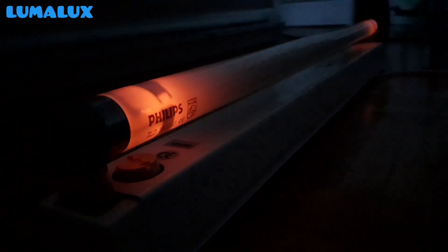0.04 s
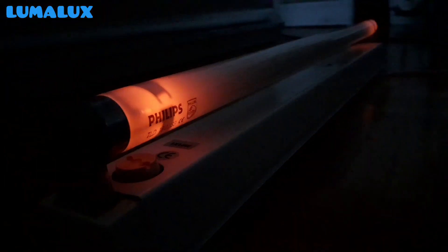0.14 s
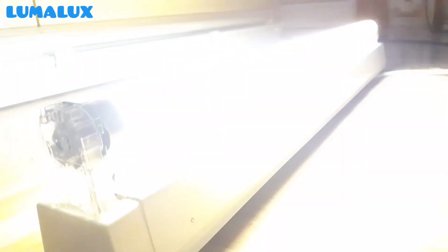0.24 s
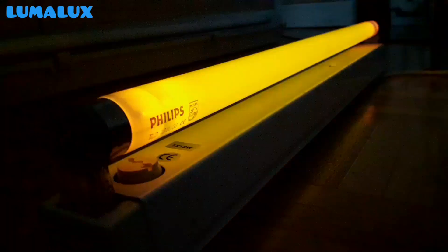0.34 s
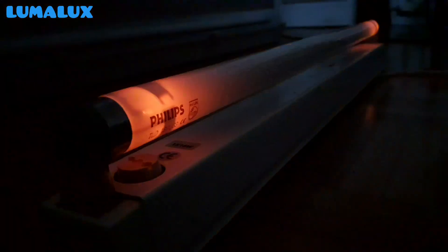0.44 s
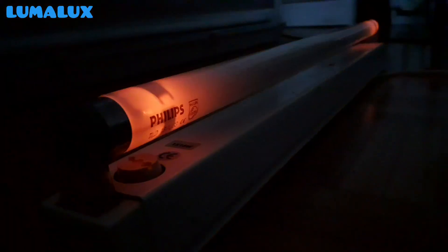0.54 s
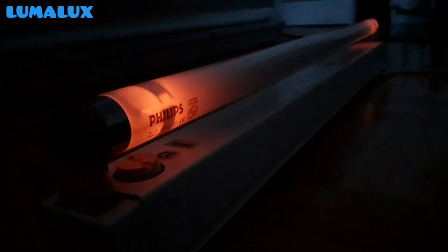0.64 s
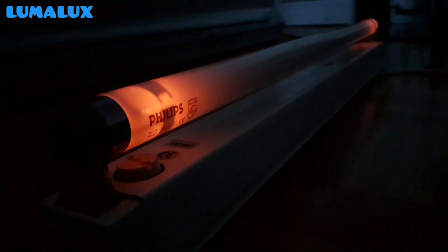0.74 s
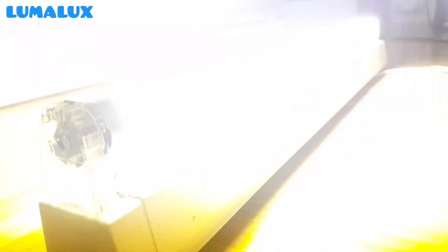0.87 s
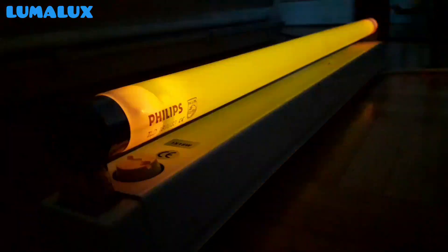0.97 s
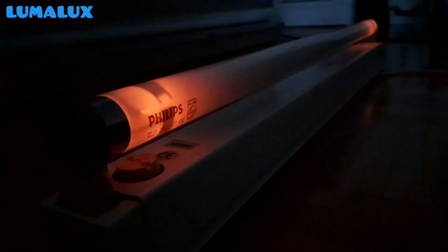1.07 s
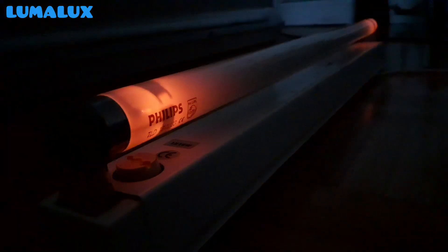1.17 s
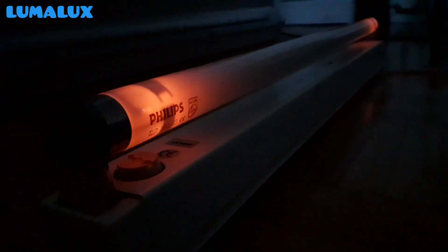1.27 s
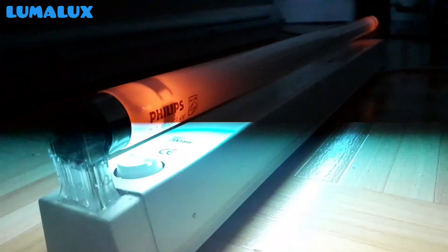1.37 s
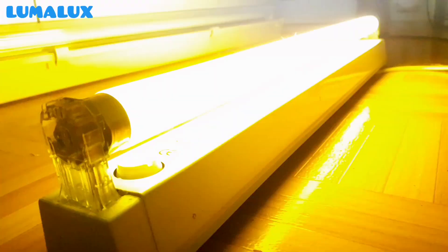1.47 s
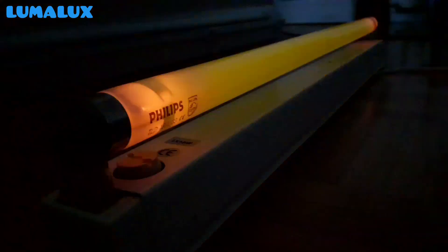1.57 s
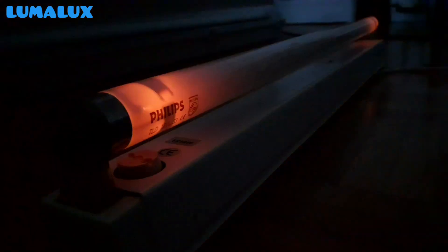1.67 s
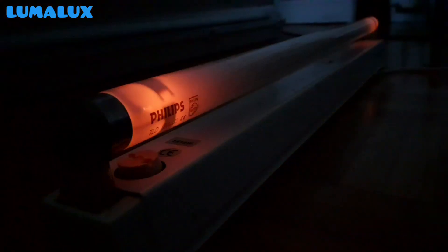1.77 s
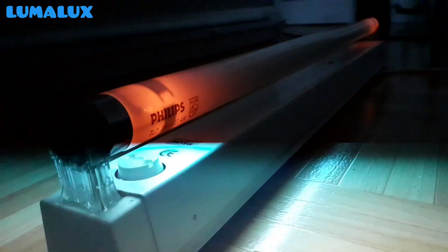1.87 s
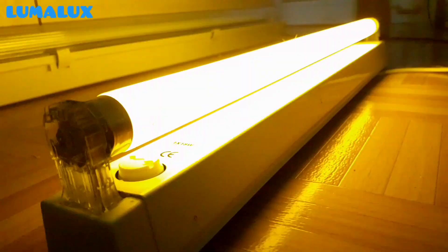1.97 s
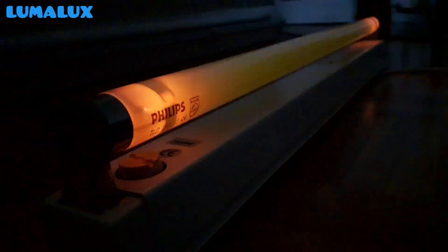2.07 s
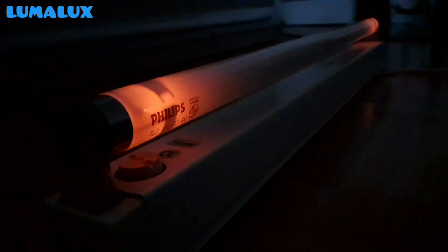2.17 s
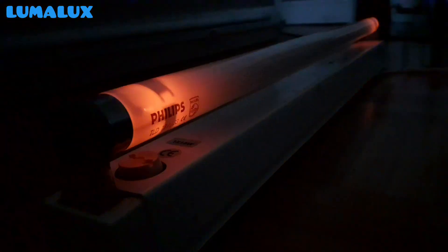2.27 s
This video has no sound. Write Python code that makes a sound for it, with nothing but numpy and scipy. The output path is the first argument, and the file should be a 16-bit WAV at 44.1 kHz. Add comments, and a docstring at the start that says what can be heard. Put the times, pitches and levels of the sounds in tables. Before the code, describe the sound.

Four short rattling clinks of a flickering fluorescent lamp in a quiet room with faint ballast hum

```python
"""A faint mains hum in a quiet room comes first; then a fluorescent tube tries four times to strike.
Each try opens with a glassy ping of the starter, a decaying sum of modes and dense coloured noise.
Current surges then knock the ballast against the sheet-steel fitting, about one mains cycle apart.
The hum, a sum of mains harmonics, dips after each try and returns; soft panel tones follow the
last three tries, and a faint low bump ends the last."""
import sys
import numpy as np
from scipy import signal
from scipy.fft import rfft, irfft
from scipy.io import wavfile

SR = 44100
rng = np.random.default_rng(int(sys.argv[2]) if len(sys.argv) > 2 else 0)


def transcribe(signal):
    """Save signal, clipped to [-1, 1], as a 16-bit WAV file at the path in sys.argv[1]."""
    frames = np.atleast_2d(signal).T
    limited = np.clip(frames, -1, 1)
    pcm = np.round(limited * 32767).astype(np.int16)
    wavfile.write(sys.argv[1], SR, pcm)


N = 101430
T = np.arange(N) / SR  # time, s

# clear modes of the sheet-steel fitting: f/Hz, level/dB, t60/s
FITTING_MODES = [(779, -7, 0.18), (874, -5.5, 0.19), (1014.7, 1, 0.17), (1065, -2, 0.13),
                 (1290, -9.5, 0.17), (1510, -4, 0.15), (1610, -11.5, 0.11), (1637, -11, 0.2),
                 (1800, -5.5, 0.11), (1904, -2.5, 0.1), (2100, -9.5, 0.085), (2270, -4.5, 0.14),
                 (2382, -3, 0.095), (2890, -19, 0.19)]
# dense ringing between the modes, fitting and glass bulb: f/Hz, spectral density level/dB per Hz
CLANK_SPECTRUM = [(400, -36.5), (700, -6.5), (860, 7.5), (930, -19), (1050, -3), (1300, -12.5), (1600, 2),
                  (2000, 5.5), (2400, 2), (2700, -30.5), (3500, -59), (8000, -70)]
SIZZLE_SPECTRUM = [(5000, -52), (9500, -22.5), (11200, -11.5), (12700, -22), (13800, 9), (14200, -1),
                   (14900, -13), (15450, 2), (16200, -19)]
# balance of the fitting's ring: modes level/dB, dense ringing level/dB, its t60/s,
# room tail level/dB, its t60/s, left-right difference level/dB
CLANK = (-7.5, -1.5, 0.0466, -19, 0.3066, 3)

# left-right correlation (1 = identical channels)
BASS_LIKENESS, MID_LIKENESS, TREBLE_LIKENESS, AIR_LIKENESS = 0.8, 0.32, 0.05, 0.13
ATTACK_S, THUD_ATTACK_S = 0.00099, 0.0028  # time constants of the onset
HUM_PAN_DB = 5.5  # left above right


def from_db(db):
    """Amplitude ratio from level: 20 dB for each factor of ten."""
    return 10 ** (np.asarray(db) / 20)


def rms_one(x):
    """Normalize the mean square to unity."""
    return x / np.sqrt(np.mean(x ** 2) + 1e-20)


def pan(db):
    """Interchannel level difference: left gains half of it and right loses half."""
    return from_db(np.array([[db], [-db]]) / 2)


def dying(t, t60):
    """Exponential decay of a linearly damped system, falling 60 dB in t60."""
    return np.exp(-np.log(1000) * t / t60)


def noise(spectrum, likeness, size):
    """Filtered white noise of unit rms; the mid-side power ratio sets the left-right correlation."""
    hz, db = np.transpose(spectrum)
    f = np.maximum(np.fft.rfftfreq(size, 1 / SR), 1)
    gain = from_db(np.interp(np.log(f), np.log(hz), db))
    white = rng.standard_normal((2, size))
    mid, side = irfft(rfft(white) * gain, size)
    c = np.clip(likeness, -1, 1)
    return rms_one(np.sqrt(1 + c) * mid + np.sqrt(1 - c) * side * np.array([[1], [-1]]))


def response(part, modes, spectrum, likeness, attack_s):
    """Impulse response by modal superposition: damped sines, dense ringing, contact snap and room tail."""
    contact_db, contact_t60 = -2, 0.0096  # level over the dense ringing, dB; decay, s
    mode_scatter_db = 1.5  # standard deviation from blow to blow
    modes_db, dense_db, dense_t60, room_db, room_t60, pan_db = part
    t = T[:SR // 2]

    # the three decays add in power
    contact = from_db(dense_db + contact_db) * dying(t, contact_t60)
    dense = from_db(dense_db) * dying(t, dense_t60)
    room = from_db(room_db) * dying(t, room_t60)
    envelope = np.sqrt(contact ** 2 + dense ** 2 + room ** 2)
    out = noise(spectrum, likeness, len(t)) * envelope

    # opposite phase shifts give each mode the chosen left-right correlation
    spread = np.arccos(np.clip(likeness, -1, 1)) / 2 * np.array([[1], [-1]])
    for k, (hz, db, t60) in enumerate(modes):
        level_db = modes_db + db + mode_scatter_db * rng.standard_normal()
        strength = from_db(level_db) * rng.choice([-1, 1])
        phase = 2 * np.pi * hz * t + spread * (-1) ** k
        out = out + strength * np.sin(phase) * dying(t, t60)
    onset = 1 - np.exp(-t / attack_s)
    return out * onset * pan(pan_db)


def strike(times, levels_db, *body):
    """Linear superposition of blows, each with a freshly drawn response of the body."""
    out = np.zeros((2, N + SR))  # room for the last ring
    for s, db in zip(times, levels_db):
        i = int(s * SR)
        ring = response(*body)
        out[:, i:i + ring.shape[1]] += from_db(db) * ring
    return out[:, :N]


def room_air():
    """Stationary random noise: room air and microphone hiss, shaped by its spectral density."""
    # f/Hz, spectral density level/dB per Hz
    air_spectrum = [(25, -28), (70, -6), (140, -1), (260, 2), (420, 4.5), (720, -2), (1020, -1),
                    (1450, -13), (1900, -9), (2700, -21.5), (4000, -16), (6500, -27), (7700, -27.5),
                    (9400, -33), (12000, -14), (15500, -16)]
    air_db, air_pan_db = -62.5, 2
    return from_db(air_db) * noise(air_spectrum, AIR_LIKENESS, N) * pan(air_pan_db)


def room_rumble():
    """Stationary random noise concentrated at low frequencies."""
    # f/Hz, spectral density level/dB per Hz
    rumble_spectrum = [(20, -17), (45, -11.5), (75, 2), (140, 3.5), (250, -13.5), (600, -44)]
    rumble_db = -78
    return from_db(rumble_db) * noise(rumble_spectrum, AIR_LIKENESS, N)


def hum():
    """Fourier synthesis of the ballast core: mains harmonics with staggered phases make an even drone."""
    mains_hz = 49.95
    waver_db, waver_per_s = 0.98, 8.56  # standard deviation of the drawn levels; draws per second
    # harmonics: nominal f/Hz (rounded to a whole multiple of the mains), rms level/dB before panning
    hum_lines = [(200, -80), (300, -61.5), (400, -52), (450, -81), (500, -68.5), (600, -77.5), (700, -80.5),
                 (1000, -78), (1100, -91)]
    # dips after each try: centre t/s, half length/s, depth level/dB
    hum_dips = [(0.357, 0.047, 6.5), (1.02, .055, 4.5), (1.56, .03, 2.5), (2.06, 0.048, 6.5)]

    dip_db = sum(depth * np.exp(-((T - s) / half) ** 4) for s, half, depth in hum_dips)
    out = 0
    for hz, db in hum_lines:
        k = round(hz / mains_hz)  # harmonic number
        waver = np.interp(T * waver_per_s, np.arange(N), rng.standard_normal(N))
        phase = 2 * np.pi * k * mains_hz * T + np.pi / 2 * (k / 2) ** 2
        out = out + from_db(db + waver_db * waver) * np.sqrt(2) * np.sin(phase)
    return out * from_db(-dip_db) * pan(HUM_PAN_DB)


def bump():
    """Damped oscillation of one low mode: a faint bump that ends the last try."""
    start_s, hz, level_db, t60 = 2.006, 62, -54, 0.14
    t = np.maximum(T - start_s, 0)
    onset = np.minimum(t * hz, 1)  # rises over one period
    return from_db(level_db) * np.sin(2 * np.pi * hz * t) * dying(t, t60) * onset


def releases():
    """Free vibration: as the current stops and the magnetic pull lets go, the widest panel rings softly."""
    hz, t60, attack_s = 440, 0.2, 0.004
    # t/s, level/dB before panning
    release_table = [(0.941, -43), (1.497, -45), (2.000, -44)]
    out = 0
    for s, db in release_table:
        t = np.maximum(T - s, 0)
        onset = 1 - np.exp(-t / attack_s)
        out = out + from_db(db) * np.sin(2 * np.pi * hz * t) * dying(t, t60) * onset
    return out * pan(HUM_PAN_DB)


def starter():
    """Impact excitation: the bimetal contact snaps, tapping the fitting and ringing can and glass bulb."""
    # t/s, then before the mix: fitting tap level/dB, can ring level/dB, bulb ring level/dB
    pings = [(0.2257, -36.5, -37.5, -44.5), (0.327, -40, -49.5, -52.5), (0.8665, -36, -39.5, -50.5),
             (1.4164, -55, -40.5, -63), (1.9185, -51, -42.5, -62), (1.9659, -62, -58, -53)]
    # clear modes: f/Hz, level/dB, t60/s
    can_modes = [(1634, 0.5, 0.24), (1816, -0.5, 0.16), (2050, -7, .14), (2316, -19, 0.2)]
    bulb_modes = [(13205, 0, .14), (13380, -7, .12), (14200, 0, .06), (15450, -6, .045)]
    # dense ringing of the can: f/Hz, spectral density level/dB per Hz
    can_spectrum = [(300, -23), (850, 6), (1050, 5), (1350, -24), (1750, 12), (2350, -6), (2900, -15),
                    (4500, -20.5), (7700, -18), (9500, -33), (16000, -32)]
    # balance of each ring: modes level/dB, dense ringing level/dB, its t60/s,
    # room tail level/dB, its t60/s, left-right difference level/dB
    can_balance = (-3, -4, 0.1734, -12, 0.38, 6)
    bulb_balance = (-1.5, -10, .04, -6, 0.1, 18)

    s, fitting_db, can_db, bulb_db = np.transpose(pings)
    tap = strike(s, fitting_db, CLANK, FITTING_MODES, CLANK_SPECTRUM, MID_LIKENESS, ATTACK_S)
    can = strike(s, can_db, can_balance, can_modes, can_spectrum, MID_LIKENESS, ATTACK_S)
    bulb = strike(s, bulb_db, bulb_balance, bulb_modes, SIZZLE_SPECTRUM, TREBLE_LIKENESS, ATTACK_S)
    return tap + can + bulb


def knocks():
    """Impulsive forcing: surges jolt the ballast; panels thud, fitting clanks, core cracks, glass bulb sizzles."""
    # t/s, then before the mix: thud level/dB, clank level/dB, crack level/dB, sizzle level/dB
    knock_table = [(0.2355, -43.5, -36.5, -51.5, -74.5), (0.2542, -39.5, -29, -42, -39.5),
                   (0.2739, -38, -27, -41, -44), (0.2935, -38, -35.5, -40.5, -49),
                   (0.8937, -37, -40.5, -45.5, -61), (0.9142, -36, -33.5, -42.5, -62),
                   (1.435, -39, -40, -48.5, -65), (1.455, -40, -39, -44.5, -65),
                   (1.4747, -39, -34.5, -44, -64), (1.9351, -40, -37, -47, -66),
                   (1.9556, -39.5, -38, -48, -62), (1.9748, -34.5, -33, -41.5, -44)]
    # clear modes of the panels: f/Hz, level/dB, t60/s
    panel_modes = [(205.8, -12, 0.23), (297.7, -4.5, 0.19), (440.1, 0, 0.37), (502, -11.5, 0.15),
                   (583.7, -5, 0.34), (620.5, -5, 0.29), (686, -14.5, 0.31)]
    # dense ringing: f/Hz, spectral density level/dB per Hz
    thud_spectrum = [(50, -36), (130, -13.5), (220, -8.5), (430, 4), (700, 2), (1000, -10), (2000, -37)]
    crack_spectrum = [(1500, -36), (2700, 0), (3200, -9), (3900, 4), (4500, -1), (5400, -6.5), (6500, -1.5),
                      (8200, -8), (9500, -21), (12000, -10.5), (16000, -15)]
    # balance of each ring: modes level/dB, dense ringing level/dB, its t60/s,
    # room tail level/dB, its t60/s, left-right difference level/dB
    thud_balance = (-4, -2, 0.1454, -17, 0.39, 3)
    crack_balance = (-20, 2.5, 0.0416, -9, .26, 7.5)
    sizzle_balance = (-20, -2.5, 0.0938, -35, 0.05, 14)

    s, thud_db, clank_db, crack_db, sizzle_db = np.transpose(knock_table)
    thud = strike(s, thud_db, thud_balance, panel_modes, thud_spectrum, BASS_LIKENESS, THUD_ATTACK_S)
    clank = strike(s, clank_db, CLANK, FITTING_MODES, CLANK_SPECTRUM, MID_LIKENESS, ATTACK_S)
    # crack and sizzle are dense ringing alone
    crack = strike(s, crack_db, crack_balance, [], crack_spectrum, TREBLE_LIKENESS, ATTACK_S)
    sizzle = strike(s, sizzle_db, sizzle_balance, [], SIZZLE_SPECTRUM, TREBLE_LIKENESS, ATTACK_S)
    return thud + clank + crack + sizzle


def scene():
    """Linear superposition of the quiet room, the hum and the striking tube."""
    low_pan_db, blows_db = 8.5, -1.5
    lows = (room_rumble() + bump()) * pan(low_pan_db)
    blows = from_db(blows_db) * (starter() + knocks())
    return room_air() + lows + hum() + releases() + blows


def record(dry):
    """Elliptic low-pass filtering: a sharp band limit cuts the top steeply."""
    cutoff_hz = 15750
    # order 12, 0.2 dB passband ripple, 80 dB stopband attenuation
    lowpass = signal.ellip(12, 0.2, 80, cutoff_hz, fs=SR, output="sos")
    return signal.sosfilt(lowpass, dry)


dry = scene()
out = record(dry)
transcribe(out)
```